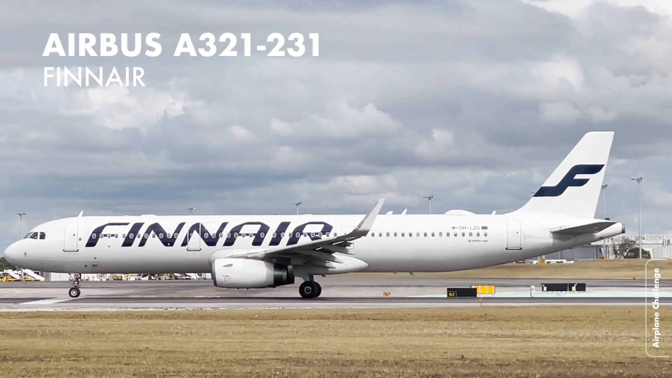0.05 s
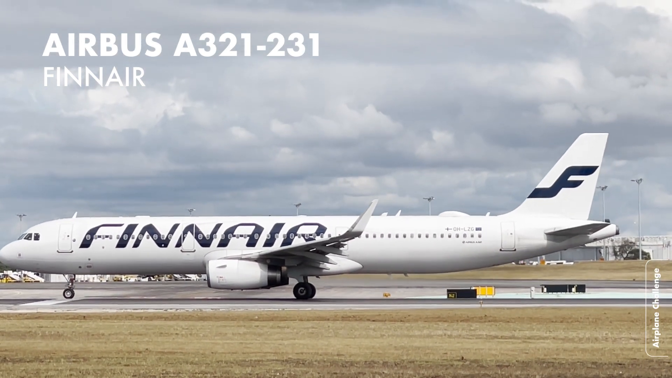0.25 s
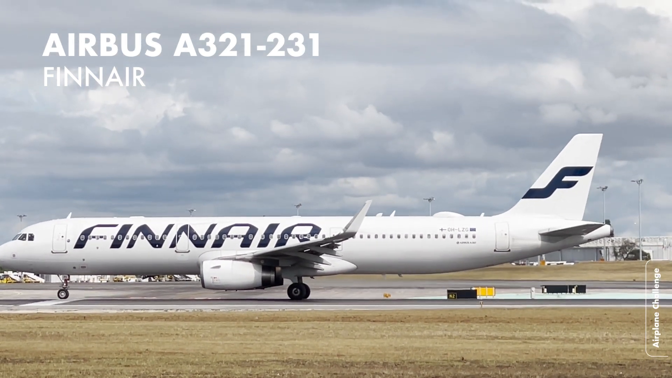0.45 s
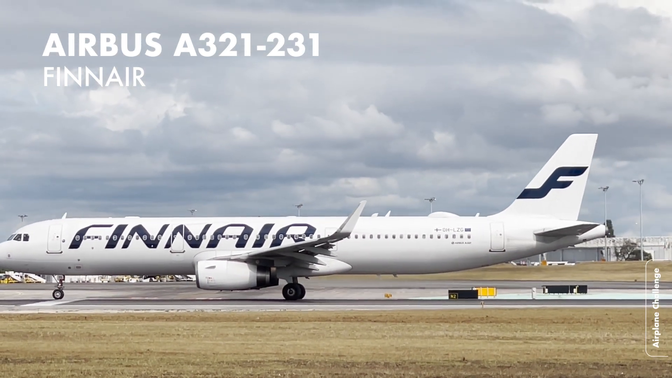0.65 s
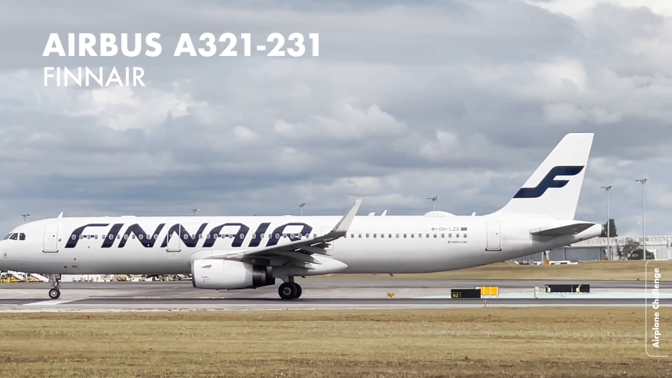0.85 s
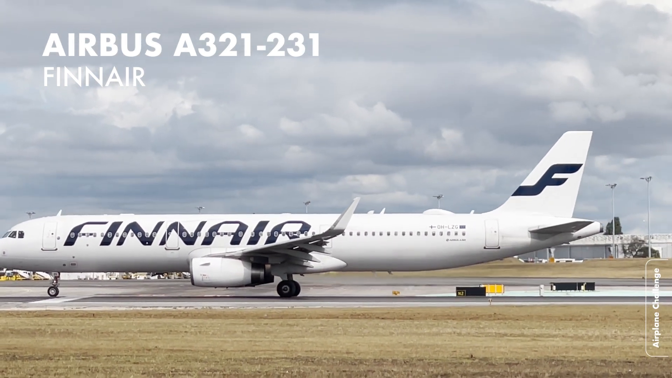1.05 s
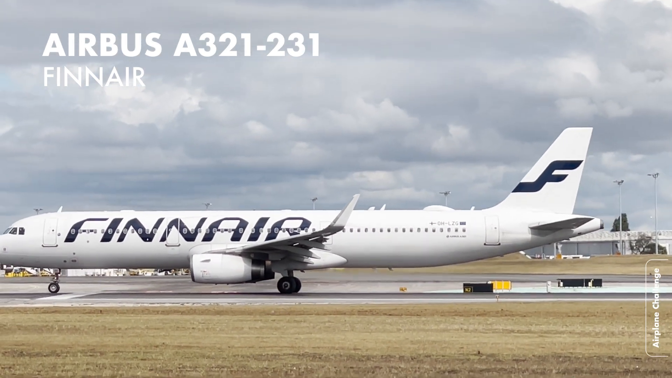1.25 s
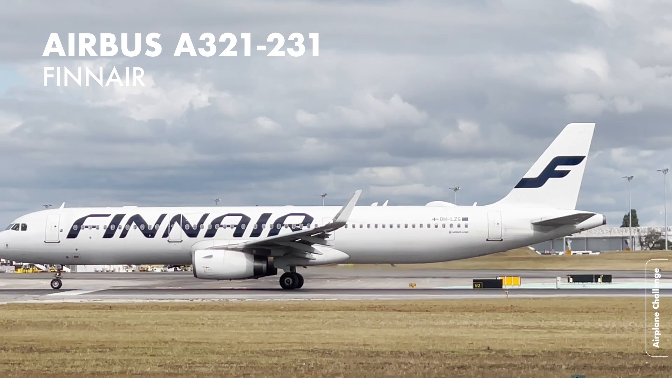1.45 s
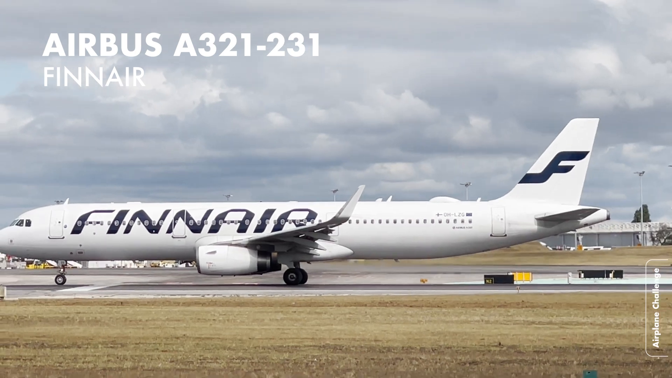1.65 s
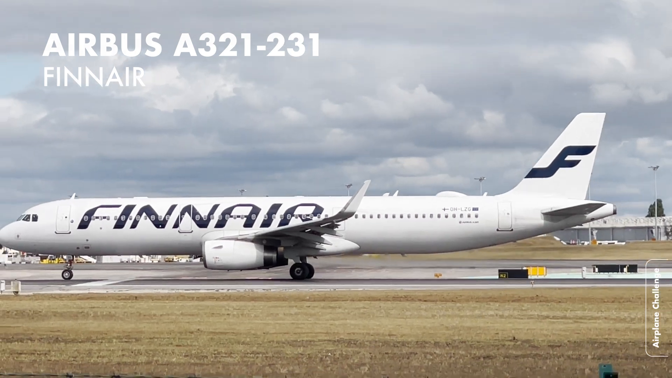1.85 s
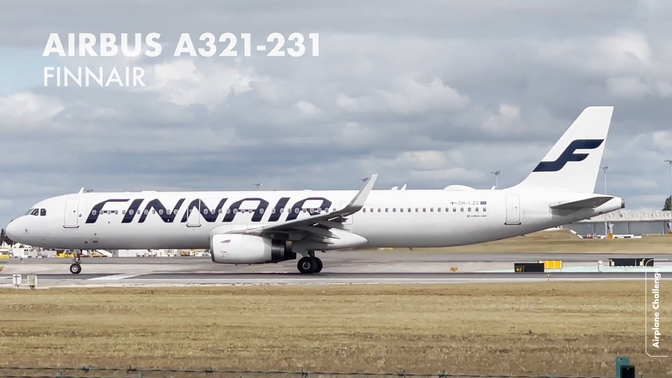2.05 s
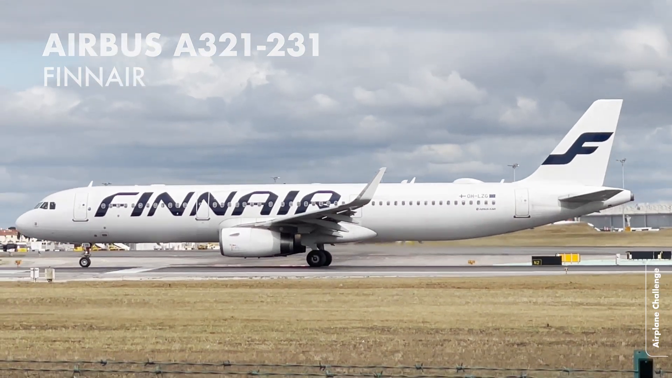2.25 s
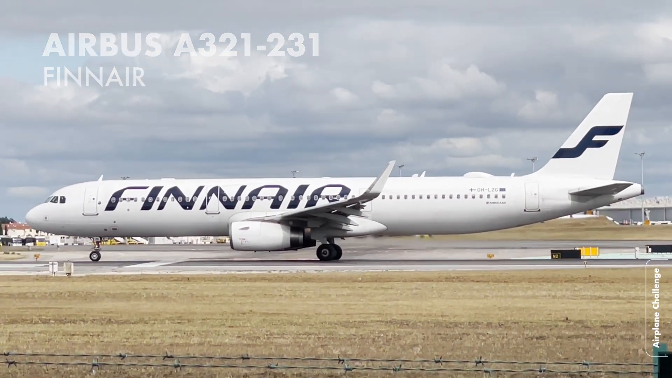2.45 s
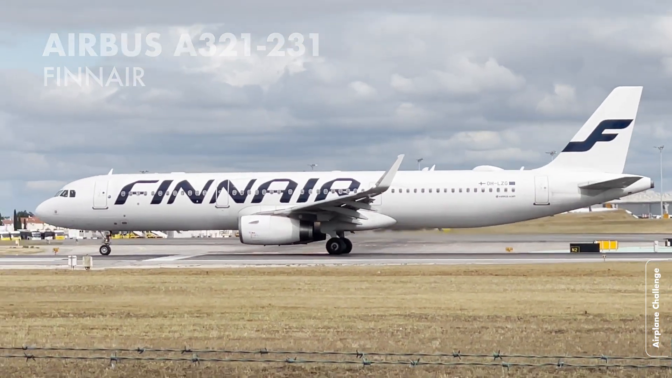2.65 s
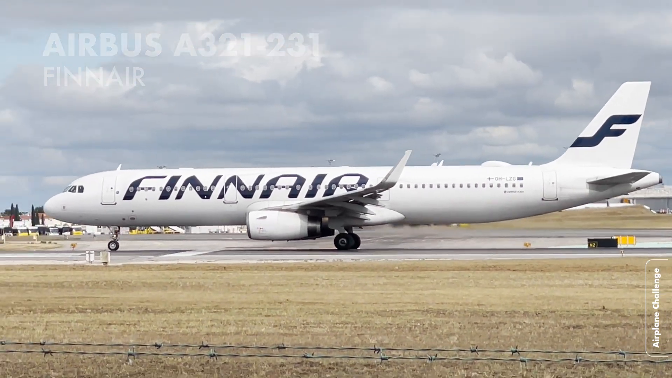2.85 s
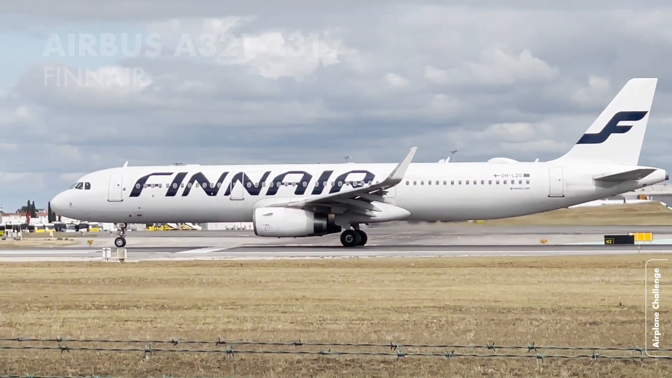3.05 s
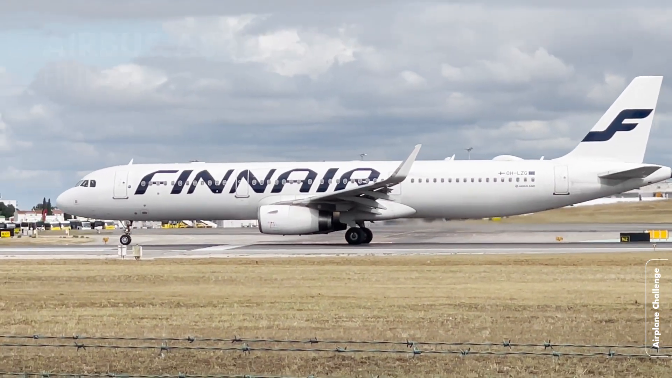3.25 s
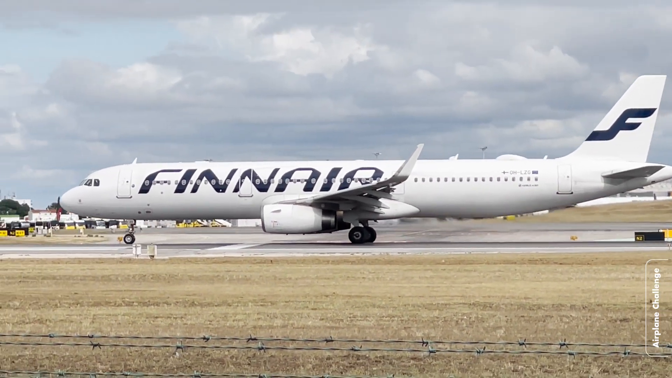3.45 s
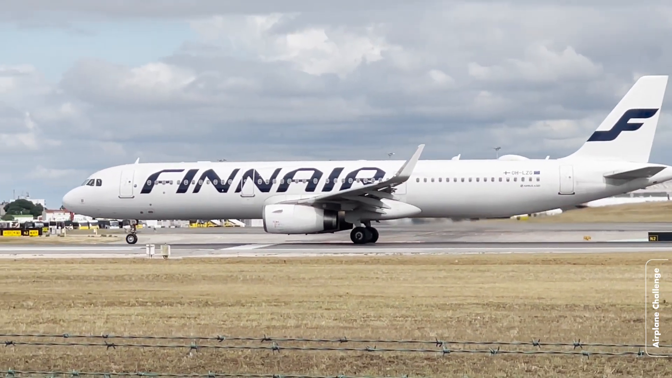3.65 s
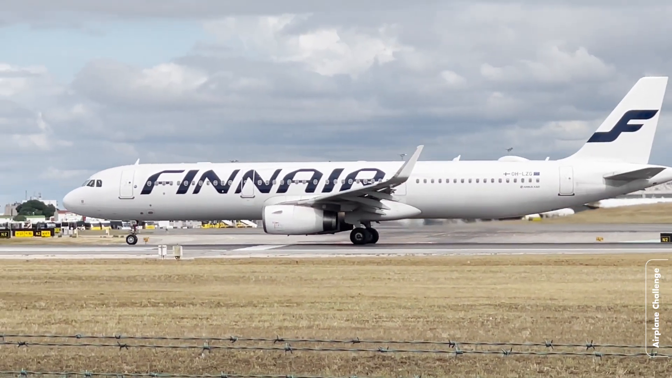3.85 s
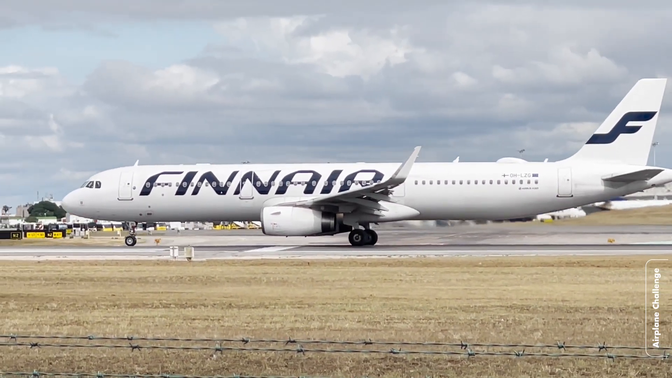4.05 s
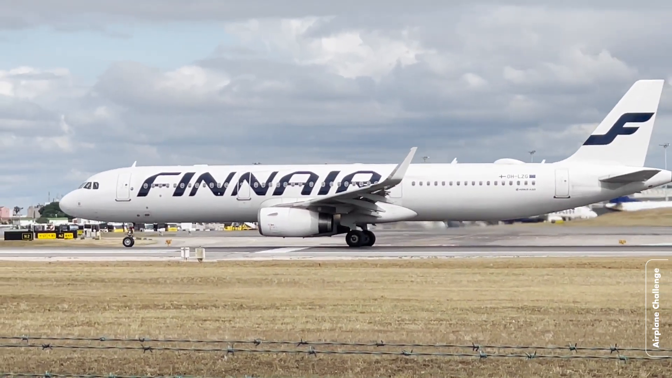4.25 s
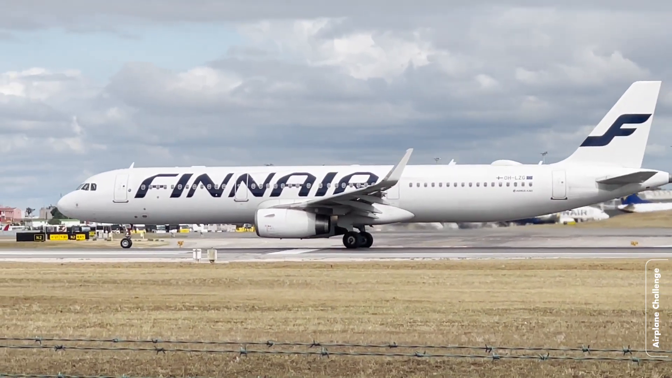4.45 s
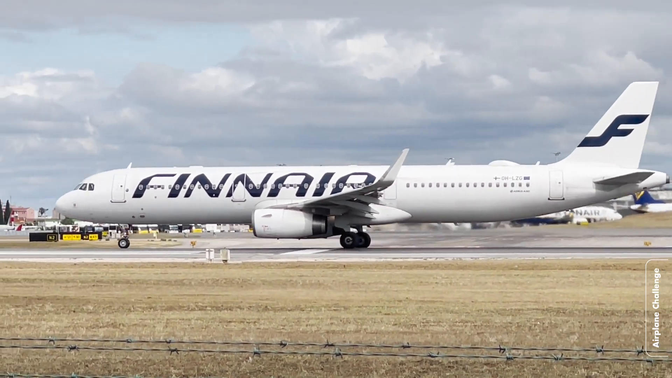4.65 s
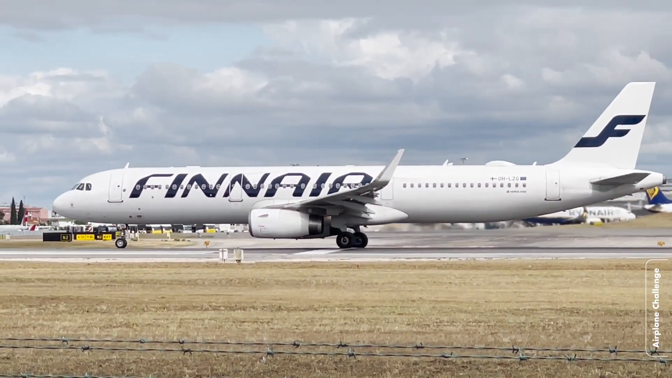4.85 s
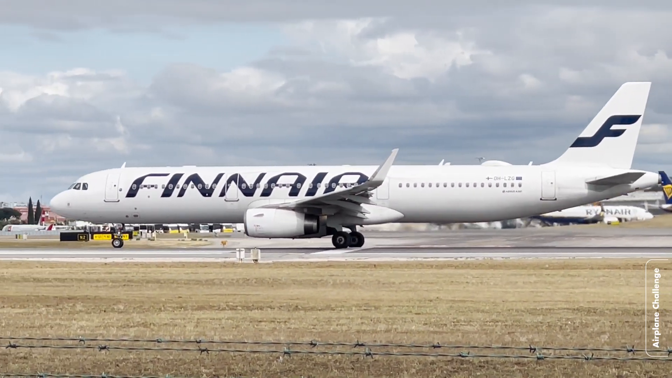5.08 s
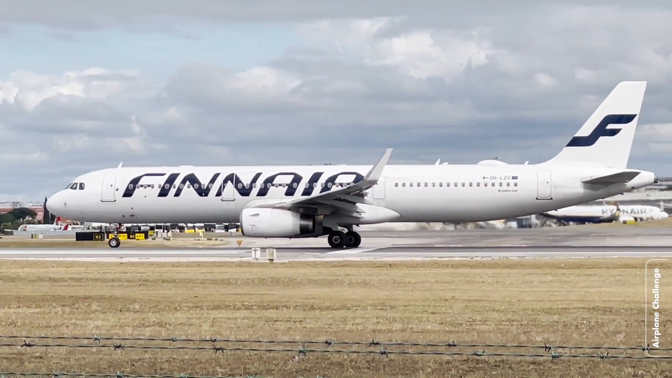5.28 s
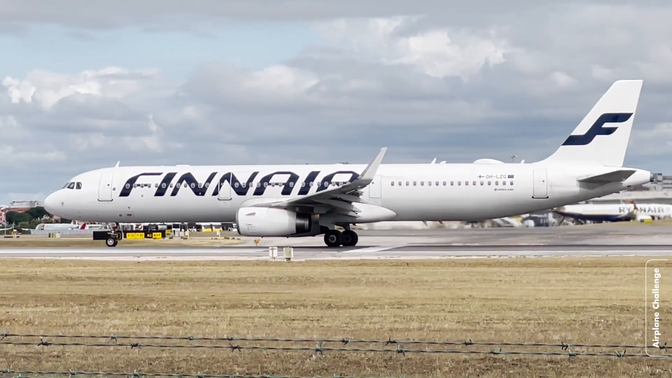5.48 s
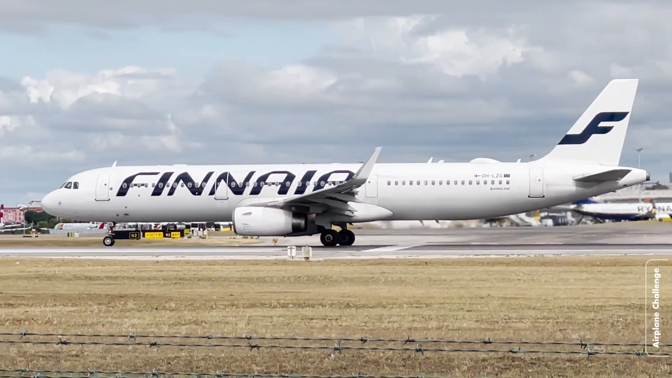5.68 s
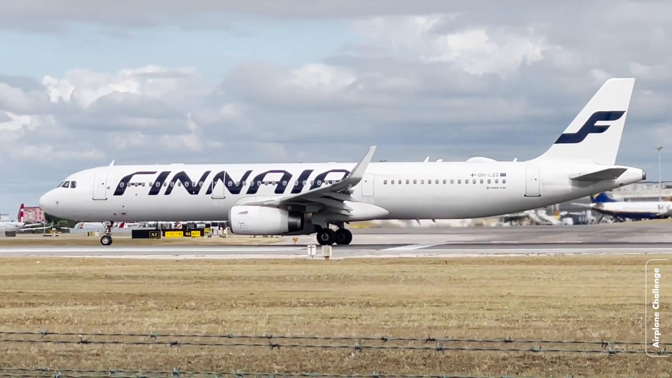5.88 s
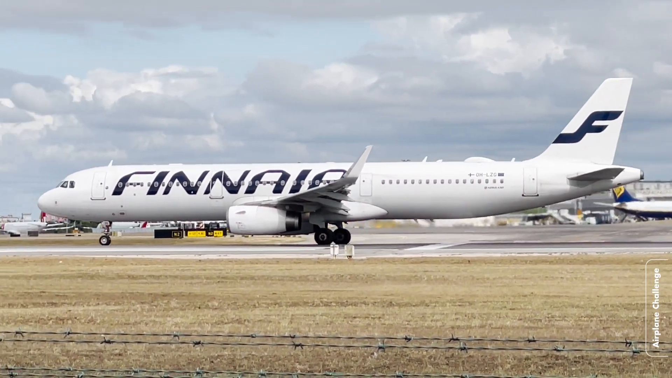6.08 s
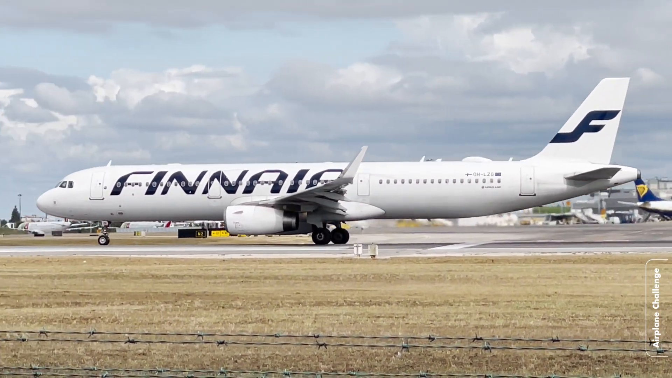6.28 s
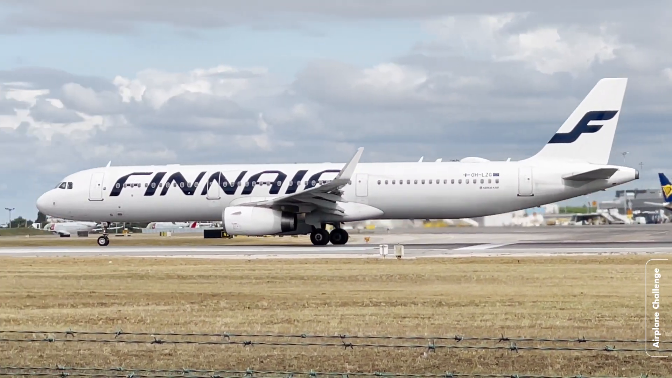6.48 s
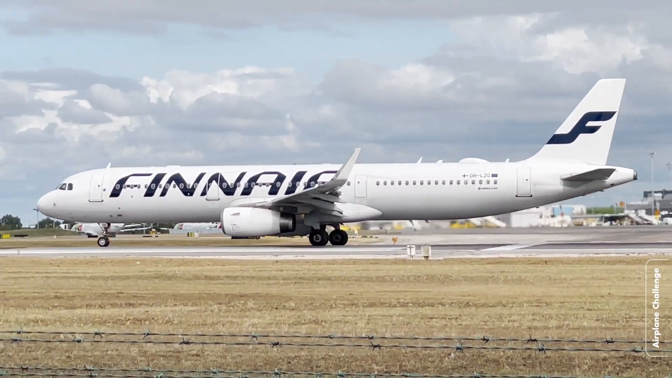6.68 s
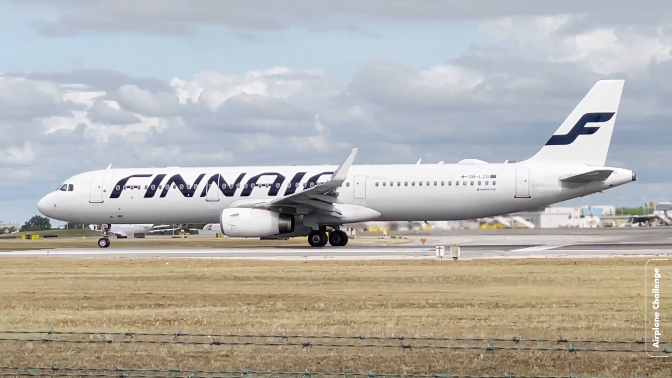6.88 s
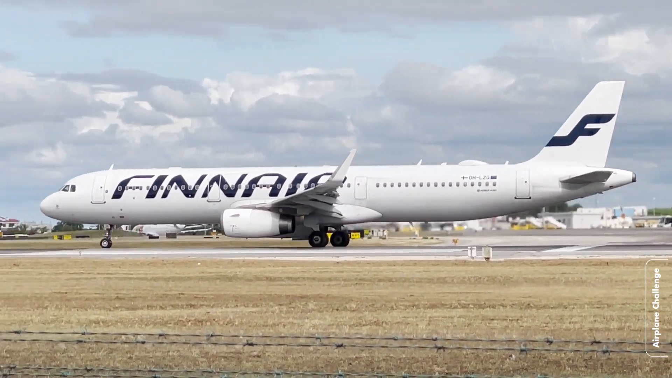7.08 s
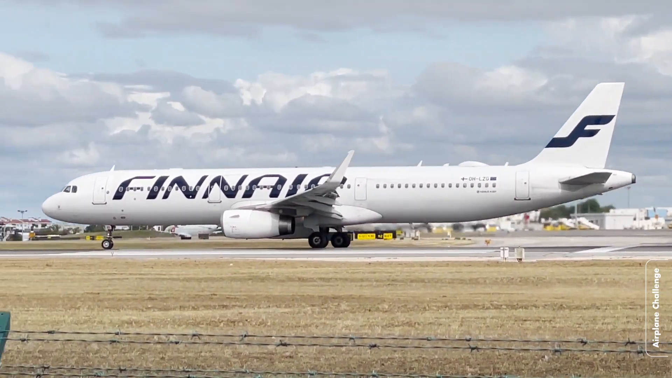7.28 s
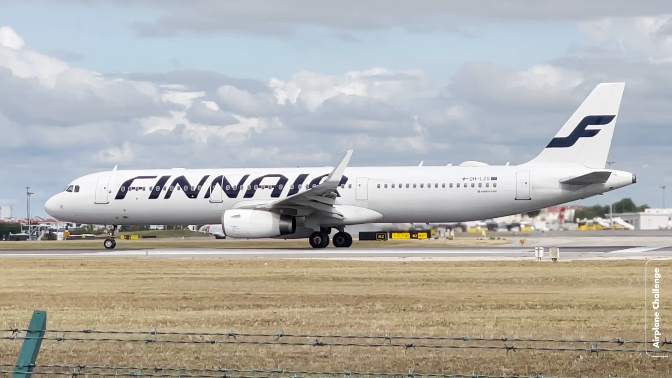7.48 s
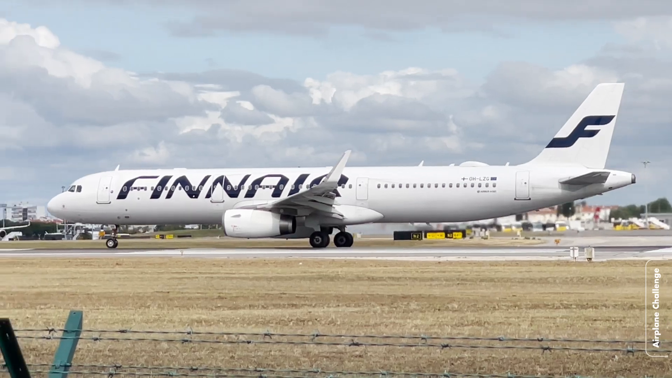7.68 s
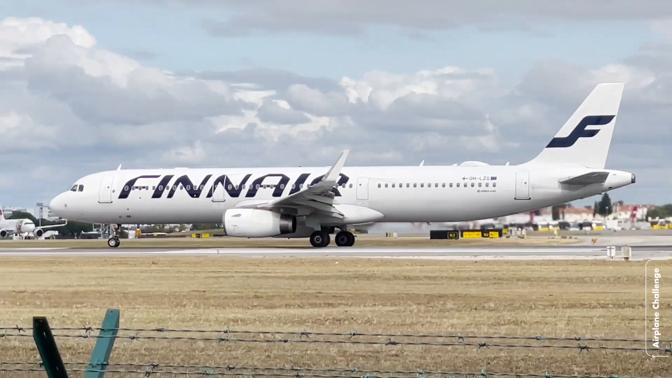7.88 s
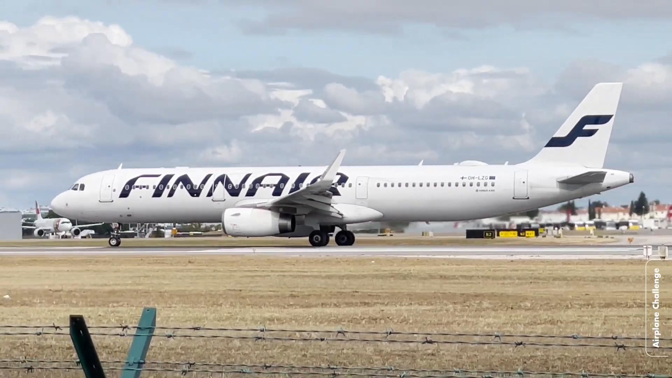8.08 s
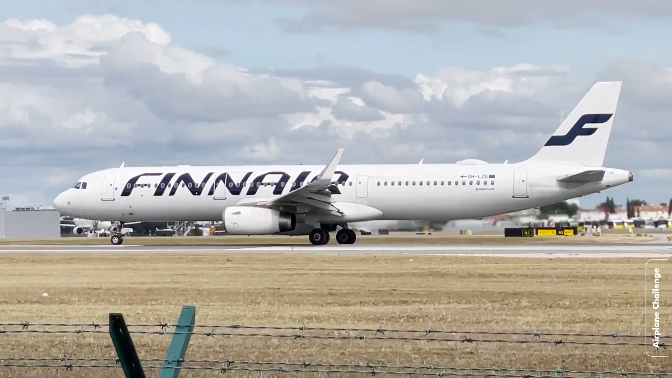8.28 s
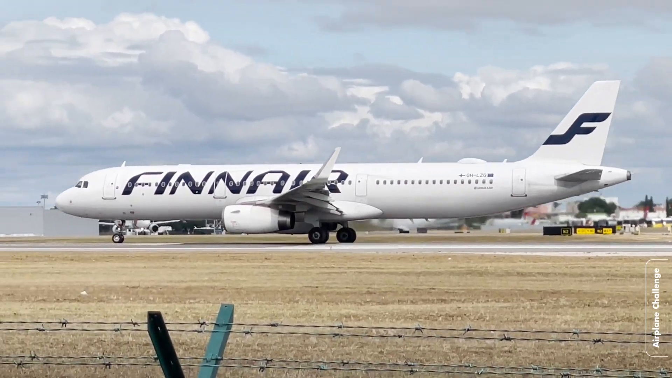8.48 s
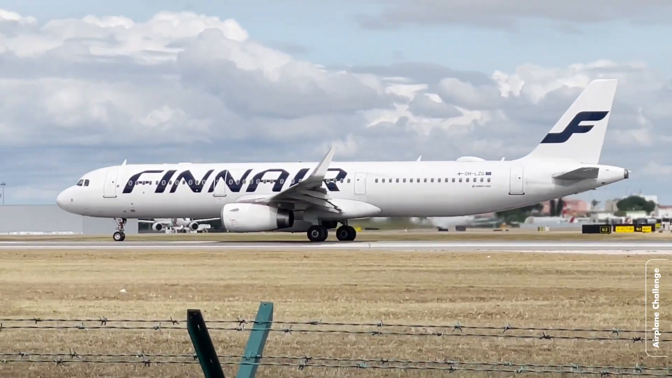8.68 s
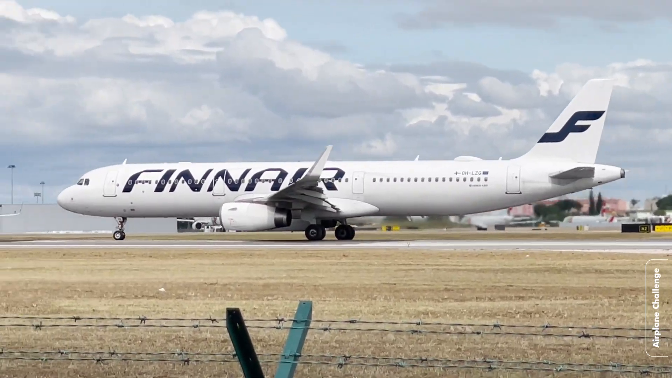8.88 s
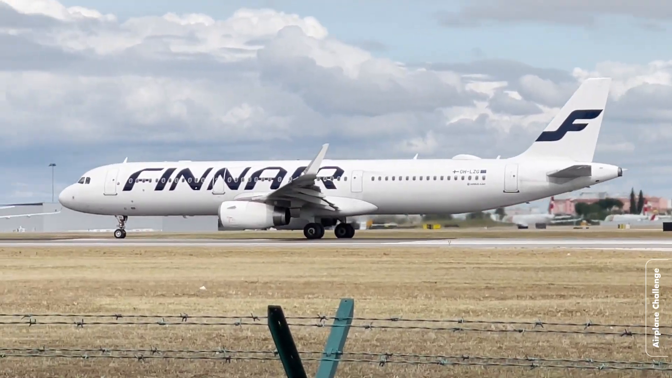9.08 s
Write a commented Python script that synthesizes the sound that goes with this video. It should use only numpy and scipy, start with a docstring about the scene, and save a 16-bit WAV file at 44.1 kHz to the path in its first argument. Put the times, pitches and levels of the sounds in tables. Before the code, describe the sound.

From 0 to about 1.5 seconds an airliner's engines run near idle across open grass: a thin, wavering high whine, a lower fan hum, soft low rumble and a fluttering airfield drone, plus a faint distant engine tone that fades after 3 seconds. The pitch starts creeping up near 1.5 seconds. Between 2 and 3.4 seconds a gust knocks dull, irregular low thumps on the close stereo microphones, with light wind noise dying away after 4. From 3 to 5.5 seconds the whine and fan tones glide steadily upward, nearly doubling, swelling and shimmering in the air, while rumble, roar and hiss build fast. By about 6 seconds the pitch levels off at full power. The loud, deep roar and rushing hiss hold to the end at 9 seconds, brightest around 7.8, with the low roar still gaining slightly.

```python
"""A jet airliner spools up from idle and begins its takeoff roll, heard across grass from beyond the fence.
Fan and compressor tones, sines scattered by the air, glide up an octave; exhaust rumble, jet roar and
fan and turbine hiss, all coloured noise, grow as powers of engine speed. Behind them lie the fluttering
noise drone of the airfield and a distant fan tone; a short gust thumps on the microphones as filtered pulses."""
import sys
import numpy as np
from scipy import signal
from scipy.fft import rfft, irfft, next_fast_len
from scipy.io import wavfile
from scipy.ndimage import uniform_filter1d

SR = 44100
rng = np.random.default_rng(int(sys.argv[2]) if len(sys.argv) > 2 else 0)


def convert_level_to_amplitude(level_db):
    """Map a level in decibels to its linear amplitude factor."""
    exponent = np.asarray(level_db, float) / 20
    return 10 ** exponent


def digitize_waveform(pressure):
    """Quantize a signal to 16-bit integers and store it at the path in sys.argv[1].

    Rows of a 2-D input are taken as channels; values are limited to [-1, 1].
    """
    field = np.atleast_2d(pressure).T
    bounded = np.clip(field, -1, 1)
    quanta = np.round(bounded * 32767).astype(np.int16)
    wavfile.write(sys.argv[1], SR, quanta)


N = 402633
TIME_S = np.arange(N) / SR
SIZE = next_fast_len(N)
HZ = np.maximum(np.arange(SIZE // 2 + 1) * SR / SIZE, 1)


def rms_one(x):
    """Scale to unit rms."""
    return x / np.sqrt(np.mean(x ** 2) + 1e-20)


def in_time(rows):
    """Columns of a table over seconds as curves, one value a sample."""
    s, *columns = np.transpose(rows)
    return [np.interp(TIME_S, s, column) for column in columns]


def at_hz(points):
    """A table over frequency, read at every bin on a log axis."""
    hz, values = np.transpose(points)
    return np.interp(np.log(HZ), np.log(hz), values)


def drift(corner_hz):
    """Slow chance: noise at SR / 20 through a double one-pole low-pass; spread 1."""
    pole = np.exp(-2 * np.pi * corner_hz * 20 / SR)
    coarse = rng.standard_normal(N // 20 + 4002)
    slow = signal.lfilter([1], [1, -2 * pole, pole * pole], coarse)[4000:]  # settled part
    return np.interp(np.arange(N) / 20, np.arange(len(slow)), rms_one(slow))


def bumps(times_s, heights, sigma_s):
    """A sum of bell-shaped rises in time."""
    coarse_s = np.arange(0, N, 64) / SR
    bells = np.exp(-.5 * ((coarse_s[:, None] - times_s) / sigma_s) ** 2)
    return np.interp(TIME_S, coarse_s, bells @ heights)


# Left-right likeness. Each row: frequency in Hz, likeness (1 is alike).
LIKENESS = [(30, 0.89), (60, 0.99), (300, 0.96), (1400, 0.94), (3000, 1), (5200, 0.91), (5700, .9995),
            (7500, .9995), (7900, 0.91), (8300, 0.85), (8900, 0.62), (9300, 0.95), (14400, 0.45)]


def likeness(spread=1):
    """Left-right likeness per bin; spread scales the departure from alike."""
    return np.clip(1 - spread * (1 - at_hz(LIKENESS)), -1, 1)


# Phase between the ports. Each row: frequency in Hz, lead of the left in radians.
LEFT_LEAD_RAD = [(60, 0), (1640, 0.1449), (3450, 0.73), (5100, .5), (5700, 0), (8800, 0), (9200, -1.46),
                 (10000, -3), (16000, 26)]
# Level between the ports. Each row: frequency in Hz, left minus right in dB.
LEFT_TILT_DB = [(60, -0.5), (110, 1.5), (200, 0.5), (370, 1.5), (690, 1), (1260, 1.0), (2320, 0.5),
                (4270, 0.0), (7850, 0.0), (14400, 0.0)]


def microphones(mid, side, alike):
    """Two close ports: a common part and a part of opposite sign, with a lead and tilt by frequency."""
    half = convert_level_to_amplitude(at_hz(LEFT_TILT_DB) / 2) * np.exp(.5j * at_hz(LEFT_LEAD_RAD))
    mid = mid * np.sqrt((1 + alike) / 2)
    side = side * np.sqrt((1 - alike) / 2)
    return irfft(np.array([(mid + side) * half, (mid - side) / half]), SIZE)[:, :N]


def turbulence(spectrum, flutter_db, spread=0.19, patchy_db=0):
    """Unit-rms coloured noise, then fluttering in the moving air; patchy_db adds flutter by spectral patch."""
    mid, side = rfft(rng.standard_normal((2, SIZE))) * convert_level_to_amplitude(at_hz(spectrum))
    alike = likeness(spread)
    patch_count = 3 if patchy_db else 1
    patch = (3 * np.log2(HZ)).astype(int) % patch_count  # third-octave bands dealt in turn
    total = 0
    for k in range(patch_count):
        part = microphones(mid * (patch == k), side * (patch == k), alike)
        total = total + part * convert_level_to_amplitude(patchy_db * drift(2.85))
    return rms_one(total) * convert_level_to_amplitude(flutter_db * drift(2.3))


def tone(hz, level_db, blur_hz, steady):
    """A tone scattered by the air: a steady power share, the rest wavering in size and phase."""
    waver = (drift(blur_hz) + 1j * drift(blur_hz)) * np.sqrt((1 - steady) / 2)
    carrier = np.exp(2j * np.pi * np.cumsum(hz) / SR)
    return convert_level_to_amplitude(level_db) * np.sqrt(2) * np.real((np.sqrt(steady) + waver) * carrier)


def tones_at_microphones(tones):
    """Tones at both ports; a copy of all the tones, 1/7 s late, sets the two ports apart."""
    late = np.pad(tones, (SR // 7, 0))[:N]
    return microphones(rfft(tones, SIZE), rfft(late, SIZE), likeness())


# Engine speed as compressor whine. Each row: time in seconds, whine pitch in Hz.
SPOOL = [(0.0, 3757), (1.2, 3784), (1.6, 3869), (2.0, 4033), (2.4, 4267), (3.2, 4754), (3.6, 5040),
         (4.0, 5396), (4.4, 5859), (5.2, 6827), (5.5, 7174), (5.8, 7374), (6.1, 7435), (6.6, 7475),
         (7.4, 7501), (8.2, 7486), (9.13, 7444)]


def whine_pitch():
    """Compressor whine in Hz, proportional to engine speed."""
    return in_time(SPOOL)[0]


# Aircraft draws level, air carries it better or worse. Each row: time in seconds, gain in dB before a layer's share.
CARRY = [(0, -0.5), (3.4, 1), (4.2, 0), (4.9, -0.5), (5.3, 2), (5.7, 0), (6.15, 1.5), (6.5, 1.5), (7.05, 2),
         (7.3, 4), (7.6, 4), (7.83, 7), (8.3, 4.5), (8.9, 3.5), (9.13, 4.5)]


def level(law):
    """Level in dB: idle power plus power growing with speed, then a share of the carry."""
    idle_db, full_db, exponent, carry_share = law  # exponent: amplitude against speed
    whine_hz = whine_pitch()[::64]
    speed = whine_hz / np.max(SPOOL)
    carry_db = in_time(CARRY)[0][::64]
    power = convert_level_to_amplitude(2 * idle_db) + convert_level_to_amplitude(2 * full_db) * speed ** (2 * exponent)
    db = 10 * np.log10(power) + carry_share * carry_db
    return np.interp(np.arange(N) / 64, np.arange(len(db)), db)


# Airfield drone spectrum. Each row: frequency in Hz, relative density in dB per Hz.
DRONE_SPECTRUM = [(150, -44), (300, -7.5), (500, -8), (850, -3), (1300, -14), (2000, -3.5), (2700, -4),
                  (3100, -18.5), (6000, -26), (10000, -51)]


def airfield_drone():
    """Drone of the airfield: wide coloured noise with a constant mean level."""
    return convert_level_to_amplitude(-43.5) * turbulence(DRONE_SPECTRUM, flutter_db=1.5, spread=6.5)


# Another idling fan. Each row: time in seconds, pitch in Hz, level in dB.
DISTANT_TONE = [(0, 890, -55.5), (1.7, 879, -60), (2.9, 926, -51), (3.4, 935, -77), (9.13, 950, -99)]


def distant_fan():
    """One mostly steady tone of another idling fan, fading out."""
    return tones_at_microphones(tone(*in_time(DISTANT_TONE), blur_hz=4, steady=.8))


# Gust thumps. Each row: time in seconds, peak in dB before chance.
THUMPS = [(2.057, -21), (2.209, -33), (2.27, -26), (2.474, -38), (2.71, -31), (2.758, -26), (2.797, -15),
          (2.89, -23), (3.0, -30), (3.068, -28), (3.242, -18), (3.332, -16)]
# Port wind noise. Each row: frequency in Hz, relative density in dB per Hz.
WIND_SPECTRUM = [(30, -25), (90, -4.5), (150, -1), (220, -9), (320, -28), (600, -55.5)]


def gust():
    """Eddies push the membranes as band-passed pulses; wind noise rises, blows, dies and lumps at each."""
    thump_s, thump_db = np.transpose(THUMPS)
    chance_db = 3.0 * rng.standard_normal((len(thump_s), 2))
    pulses = np.zeros((2, N))
    pulse_at = np.round((thump_s + .004) * SR).astype(int)
    pulses[:, pulse_at] = convert_level_to_amplitude(thump_db[:, None] + chance_db + [1, -1]).T
    sos = np.vstack([signal.butter(2, 70, "high", fs=SR, output="sos"),
                     signal.butter(5, 260, fs=SR, output="sos")])
    pulse_peak = np.max(np.abs(signal.sosfilt(sos, np.eye(1, 4000)[0])))
    thumps = signal.sosfilt(sos, pulses + 1e-18) / pulse_peak

    from_s, to_s, rise_db_per_s, fall_db_per_s = 2.16, 4.2, 28, 12
    blow_db = -39 - rise_db_per_s * np.maximum(from_s - TIME_S, 0)
    blow_db -= fall_db_per_s * np.maximum(TIME_S - to_s, 0)
    strength = convert_level_to_amplitude(blow_db) + bumps(thump_s, convert_level_to_amplitude(thump_db - 17), sigma_s=.03)
    wind = turbulence(WIND_SPECTRUM, flutter_db=0.1, spread=8.8)
    return thumps + strength * convert_level_to_amplitude(4.8 * drift(8.3)) * wind


# Turbine hiss spectrum. Each row: frequency in Hz, relative density in dB per Hz.
TURBINE_HISS_SPECTRUM = [(1500, -30), (2800, -3), (3700, -2.5), (5200, -7.5), (7400, -9.5), (9500, -14),
                         (10000, -7), (16000, -18.5)]
# Turbine hiss law: idle level in dB, full-speed level in dB, speed exponent, carry share.
TURBINE_HISS_LAW = (-55, -32, 4, 1.1)


def turbine_hiss():
    """Treble turbulence of the turbine, patchy in spectrum, growing with speed."""
    noise = turbulence(TURBINE_HISS_SPECTRUM, flutter_db=0.85, patchy_db=0.58)
    return convert_level_to_amplitude(level(TURBINE_HISS_LAW)) * noise


# Fan hiss spectrum. Each row: frequency in Hz, relative density in dB per Hz.
FAN_HISS_SPECTRUM = [(250, -43), (480, -5.5), (750, 0), (930, -3.5), (1280, -0.5), (1900, -3), (2600, -9.5),
                     (4000, -31.5), (8000, -42)]
# Fan hiss law: idle level in dB, full-speed level in dB, speed exponent, carry share.
FAN_HISS_LAW = (-47.5, -23.5, 6, 0.8448)


def fan_hiss():
    """Midrange turbulence of the fan, patchy in spectrum, growing with speed."""
    noise = turbulence(FAN_HISS_SPECTRUM, flutter_db=0.14, patchy_db=0.92)
    return convert_level_to_amplitude(level(FAN_HISS_LAW)) * noise


# Exhaust spectrum. Each row: frequency in Hz, relative density in dB per Hz.
RUMBLE_SPECTRUM = [(15, -48), (25, -41), (45, -5.5), (60, -1), (72, 1.5), (90, -2.5), (120, -8), (160, -16),
                   (250, -49), (500, -88)]
# Exhaust law: idle level in dB, full-speed level in dB, speed exponent, carry share.
EXHAUST_LAW = (-40, -12.5, 3, -0.17)


def exhaust_rumble():
    """Low exhaust turbulence, growing with speed."""
    return convert_level_to_amplitude(level(EXHAUST_LAW)) * turbulence(RUMBLE_SPECTRUM, flutter_db=0.16)


# Jet spectrum. Each row: frequency in Hz, relative density in dB per Hz.
ROAR_SPECTRUM = [(40, -48), (90, -4), (130, -1), (180, -0.5), (270, -1), (380, -6.5), (520, -15.5),
                 (900, -29), (2000, -65)]
# Jet law: idle level in dB, full-speed level in dB, speed exponent, carry share.
JET_LAW = (-47.5, -19.5, 6.5, .5)


def jet_roar():
    """Jet mixing noise, steep in speed, rising further as the nozzles swing toward the listener."""
    tail_from_s, tail_db_per_s = 6.2, 0.9
    tail_db = tail_db_per_s * np.maximum(TIME_S - tail_from_s, 0)
    return convert_level_to_amplitude(level(JET_LAW) + tail_db) * turbulence(ROAR_SPECTRUM, flutter_db=1.0)


# Swells where the air focuses blade tones. Each row: time in seconds, then rises in dB of
# the fan tone, its 2nd harmonic, its 3rd harmonic, the whines.
SWELLS = [(.6, 8, 2, 0, 4.5), (2.0, 4, 2, 0, 1), (2.3, 7, -11, 0, 1), (2.75, 5.5, 0, 2, 3.5),
          (3.0, 9, -1, 0, -0.5), (3.3, 7, 5, 1, 3.5), (3.65, 4, 4, 6, 6.5), (3.9, 1, 3, 6, 0),
          (4.12, 3, 2, 9, 5), (4.4, 9.5, 5.5, 0, 8.5), (4.9, 5, 6, 1, 4), (5.1, 5, 11, -3, 3.5),
          (5.3, 5, 4, 0, 5), (5.85, 6, 0, 2, 0), (6.05, 9, 8, 3, 8), (6.5, 9, 9, 2, 3.5),
          (7.1, 6, 0, 1, 5.5), (7.6, 7, 6, 2, 3.5), (7.87, 7, 6, 0, 8), (8.45, 0, -5, 1, 4.5),
          (8.8, 4, 0, 0, -0.5)]
# Faint stages with other blade counts. Each row: share of whine pitch, level in dB against the whine.
FAINT_WHINES = [(.977, -9), (1.09, -17)]
# Tone laws, each: idle level in dB, full-speed level in dB, speed exponent, carry share.
FAN_TONE_LAW = (-63, -41, 3.5, -0.1)
SECOND_LAW = (-70, -51.5, 0.9, 0.5)
THIRD_LAW = (-76, -55, 1.8, -2.5)
SHAFT_LAW = (-90, -40, 6, 0.5)
LOWER_WHINE_LAW = (-86, -51.5, 2.2, 0.7)
WHINE_LAW = (-73, -45.5, 3, 0.85)


def blade_tones():
    """Blade-passing tones locked to engine speed, with a haze of noise around the whine."""
    whine_hz = whine_pitch()
    # the heavier fan turns slower and trails a little
    whine_per_fan, fan_lag_s = 4.037, .048
    fan_hz = np.interp(np.arange(N) - fan_lag_s * SR, np.arange(N), whine_hz) / whine_per_fan

    swell_s, *rises_db = np.transpose(SWELLS)
    fan_swell, second_swell, third_swell, whine_swell = [bumps(swell_s, r, sigma_s=0.1) for r in rises_db]
    whine_db = level(WHINE_LAW) + whine_swell

    out = tone(fan_hz, level(FAN_TONE_LAW) + fan_swell, blur_hz=15, steady=0.55)
    out += tone(2 * fan_hz, level(SECOND_LAW) + second_swell, blur_hz=16, steady=.5)
    out += tone(3 * fan_hz, level(THIRD_LAW) + third_swell, blur_hz=13, steady=.5)
    # blade tips go supersonic near full speed: a shaft order below the fan tone
    out += tone(.59 * fan_hz, level(SHAFT_LAW), blur_hz=8, steady=.4)

    out += tone(whine_hz, whine_db, blur_hz=24, steady=.4)
    out += tone(.956 * whine_hz, level(LOWER_WHINE_LAW) + whine_swell, blur_hz=25, steady=.25)
    for share, relative_db in FAINT_WHINES:
        out += tone(share * whine_hz, whine_db + relative_db, blur_hz=17, steady=.3)

    # a turbine stage far above sings only near full speed
    rise_db = 520 * np.log10(whine_hz / whine_hz.max())
    out += tone(1.521 * whine_hz, whine_db + rise_db + 12.5, blur_hz=90, steady=.15)

    # wakes of uneven blades smear the whine into a hump, narrow on broad
    mean_db = uniform_filter1d(whine_db, size=SR)
    out += tone(.96 * whine_hz, mean_db - 1.0, blur_hz=350, steady=0)
    out += tone(.93 * whine_hz, mean_db + 2.5, blur_hz=700, steady=0)
    return tones_at_microphones(out)


def scene():
    """Sum of airfield, gust and engine layers."""
    background = airfield_drone() + distant_fan() + gust()
    engine_noise = turbine_hiss() + fan_hiss() + exhaust_rumble() + jet_roar()
    return background + engine_noise + blade_tones()


def top_cut(x):
    """Nothing passes above the cut-off."""
    return signal.sosfilt(signal.butter(12, 15030, fs=SR, output="sos"), x)


# Steep, uneven top roll-off. Each row: frequency in Hz, gain in dB.
TOP_END = [(9950, 0.5), (10150, -56), (10900, -61), (11100, -25), (11700, -40), (11900, -45.5),
           (12900, -39), (13300, -6), (13900, -55)]


def record(dry):
    """Soft saturation rounds the peaks, then the top rolls off."""
    rounded = 1.15 * np.tanh(dry / 1.15)
    mix = irfft(rfft(rounded, SIZE) * convert_level_to_amplitude(at_hz(TOP_END)), SIZE)[:, :N]
    return top_cut(mix)


dry = scene()
out = record(dry)
digitize_waveform(out)
```